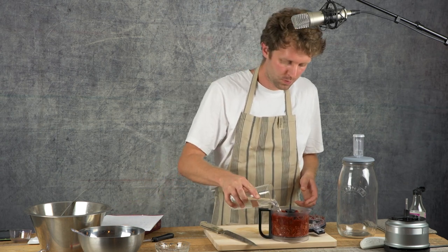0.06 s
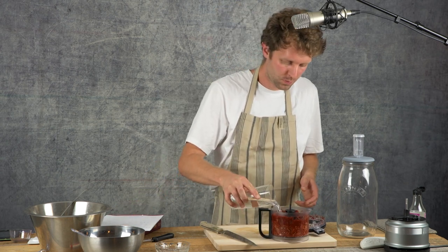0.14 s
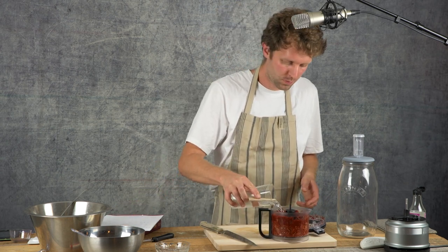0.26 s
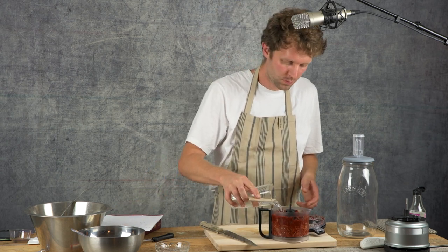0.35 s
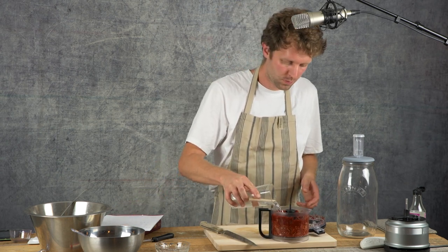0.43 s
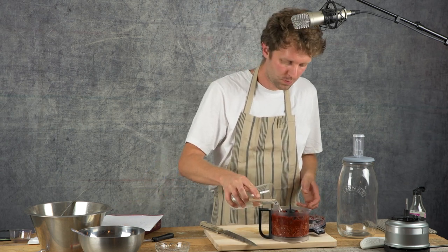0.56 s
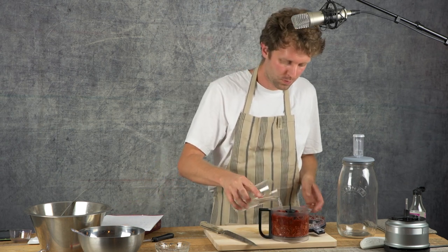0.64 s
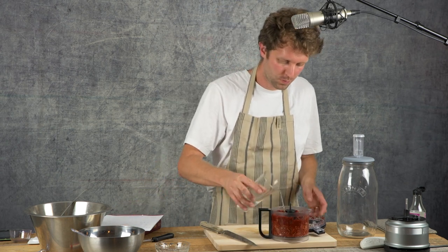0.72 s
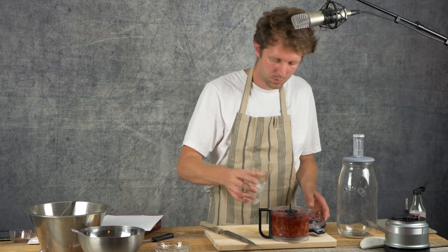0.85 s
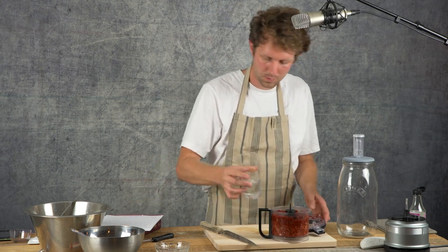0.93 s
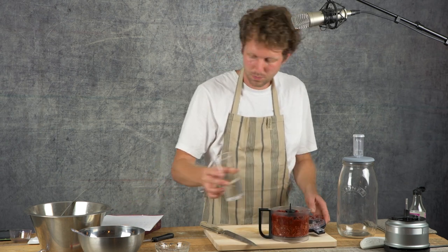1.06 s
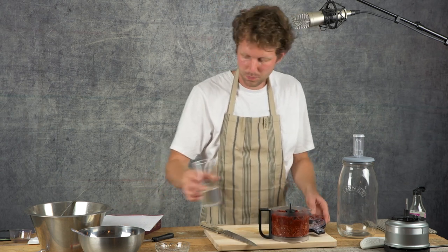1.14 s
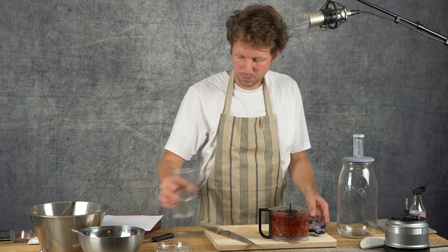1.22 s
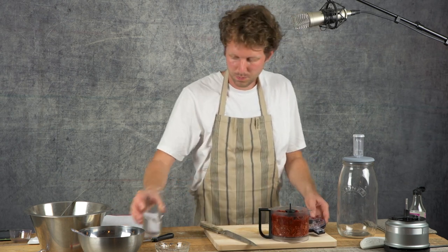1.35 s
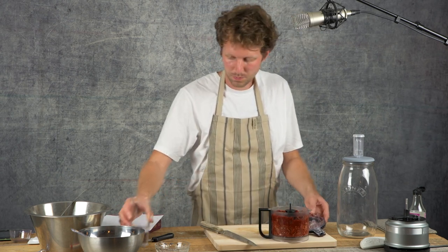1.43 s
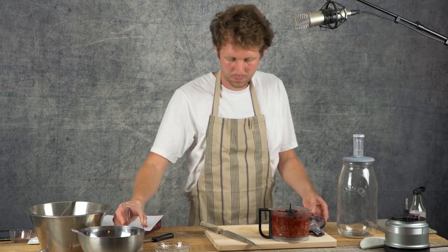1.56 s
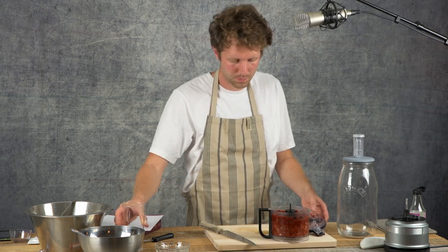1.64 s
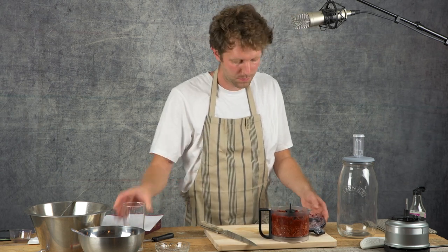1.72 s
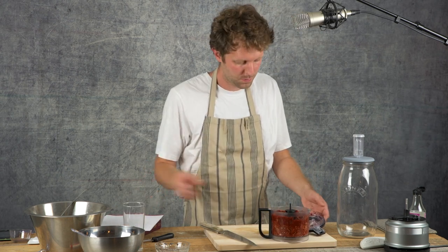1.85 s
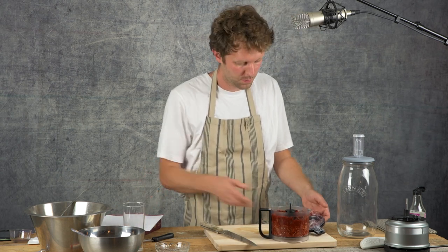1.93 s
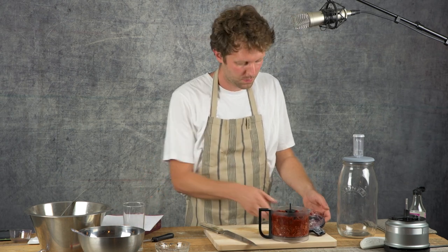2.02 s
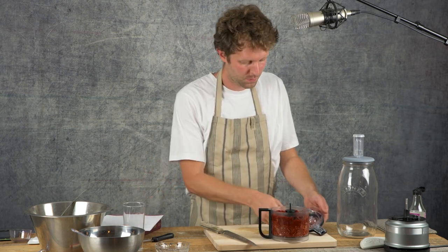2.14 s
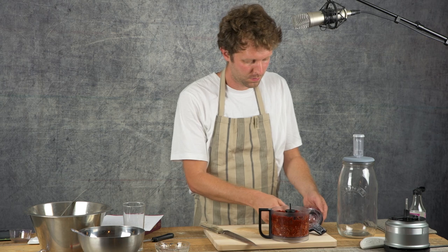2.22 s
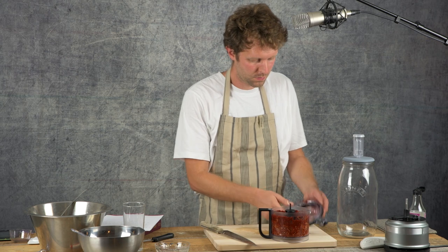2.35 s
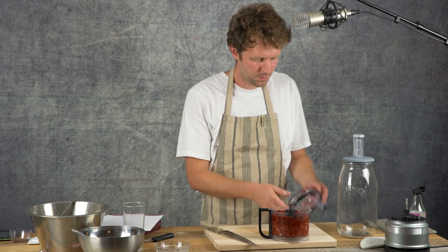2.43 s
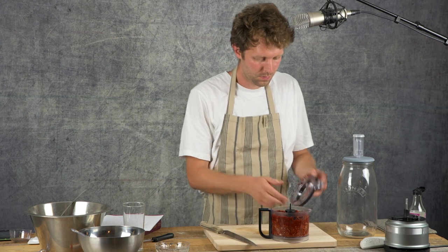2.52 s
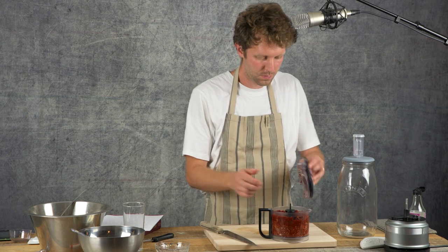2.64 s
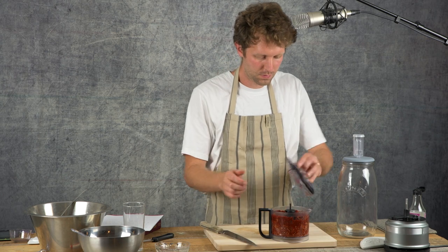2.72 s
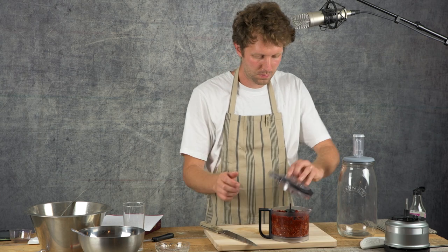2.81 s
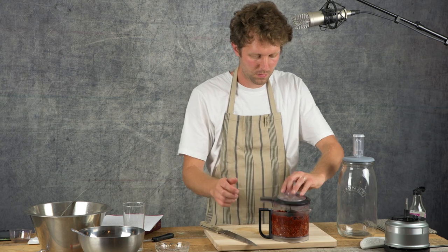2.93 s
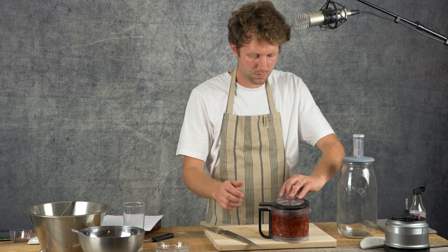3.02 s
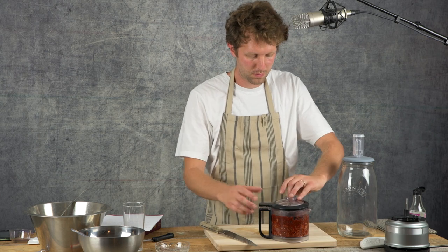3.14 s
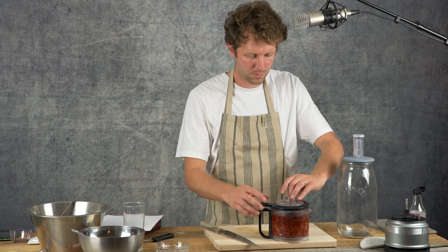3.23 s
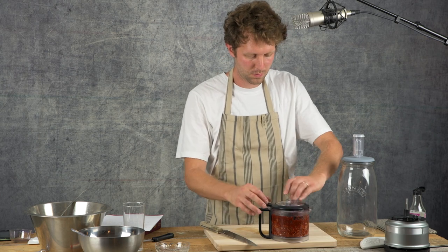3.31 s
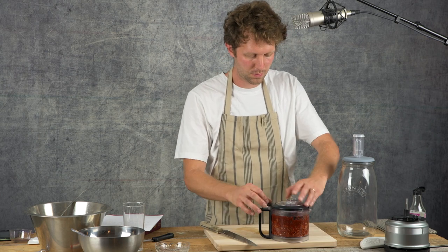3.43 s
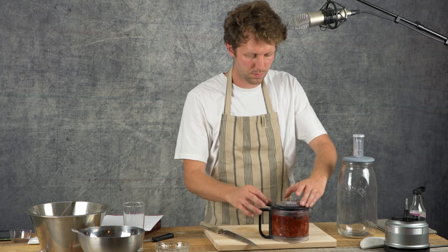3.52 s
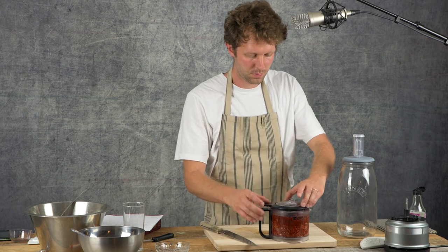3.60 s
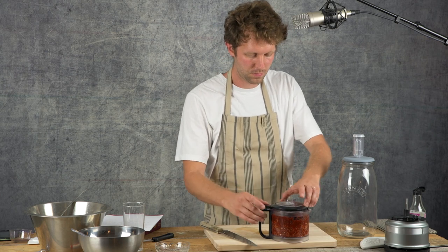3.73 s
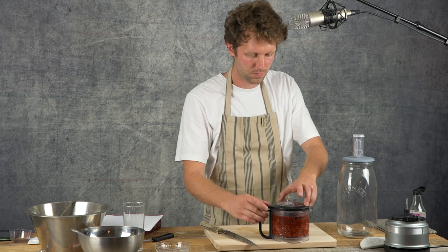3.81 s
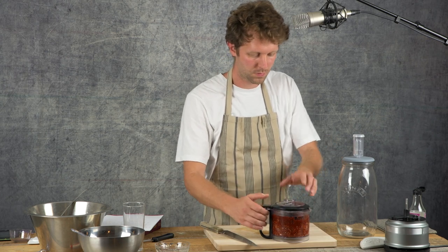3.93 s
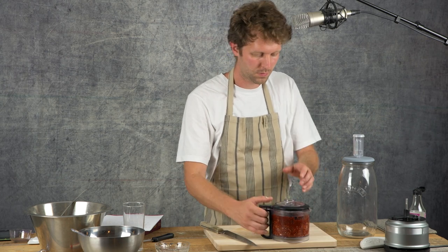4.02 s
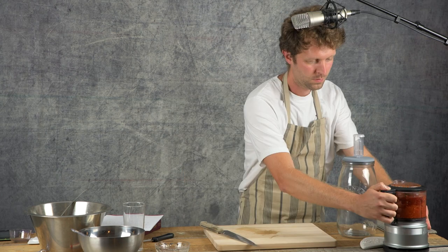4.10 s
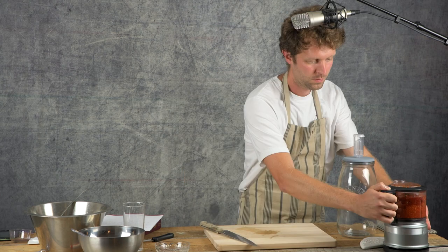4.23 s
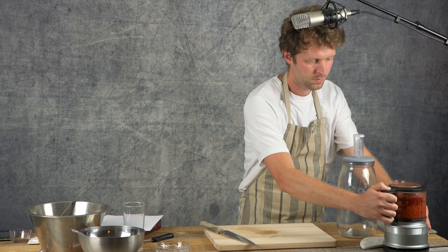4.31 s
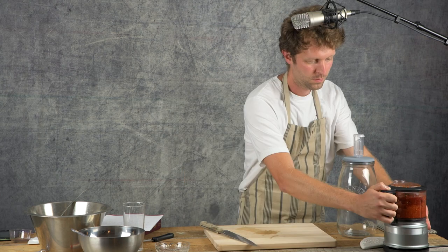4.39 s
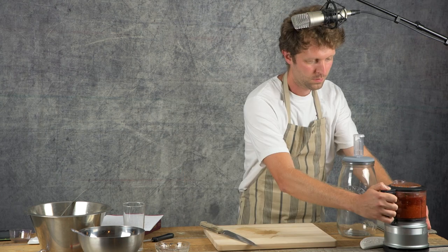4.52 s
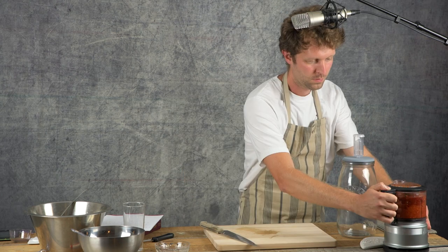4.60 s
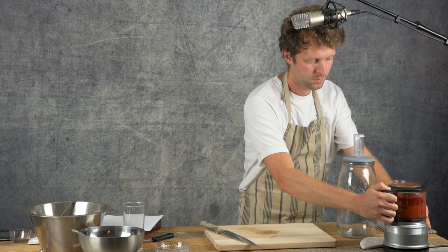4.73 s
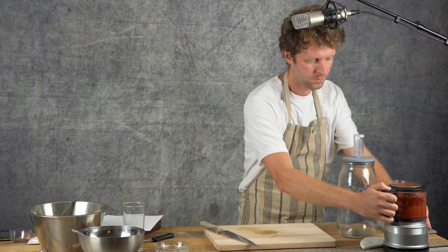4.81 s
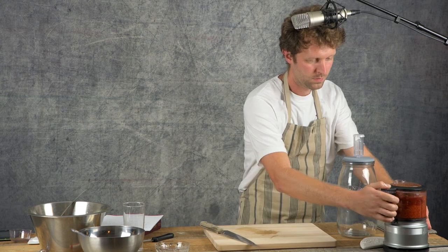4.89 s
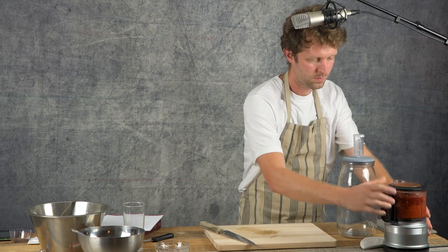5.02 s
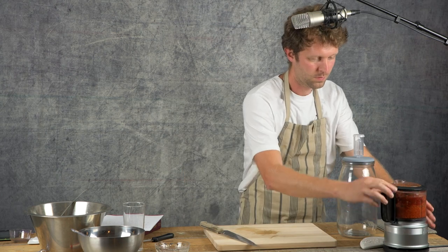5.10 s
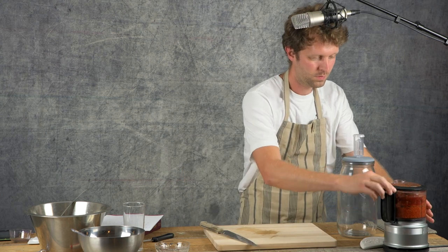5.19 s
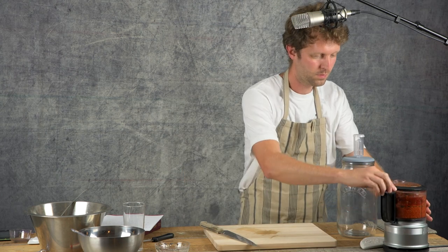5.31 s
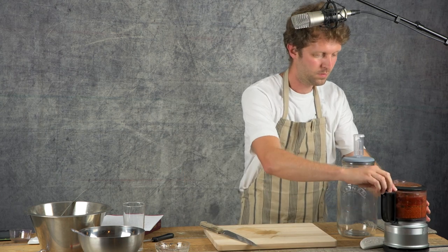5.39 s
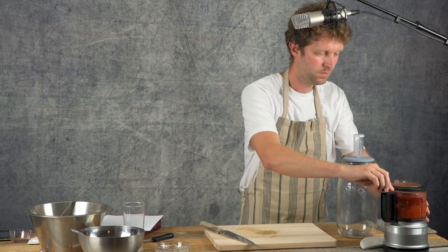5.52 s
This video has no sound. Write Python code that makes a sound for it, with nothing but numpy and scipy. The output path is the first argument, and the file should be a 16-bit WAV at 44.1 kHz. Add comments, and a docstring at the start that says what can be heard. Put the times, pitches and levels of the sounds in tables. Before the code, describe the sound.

Wet bits plop softly, a glass thuds onto wood, a plastic lid clacks and locks, then a small food processor whirs and winds down.

```python
"""Wet bits splat into a mini food processor, then the glass they came from taps and lands on a wooden table.
The plastic lid knocks about, then snaps, rubs and locks onto the bowl: each blow rings tuned modes and noise.
The motor sound begins abruptly, whirs through its gearbox and coasts down: tones and tooth impacts follow
one speed curve. A small kitchen adds a diffuse tail, faint hiss and mains hum."""
import sys
import numpy as np
from scipy import signal
from scipy.fft import rfft, irfft
from scipy.io import wavfile

SR = 44100
rng = np.random.default_rng(int(sys.argv[2]) if len(sys.argv) > 2 else 0)


def persist_wave(psi):
    """Save psi, clipped to +-1, as 16-bit WAV."""
    counts = np.round(np.clip(psi, -1, 1) * 32767).astype(np.int16)
    wavfile.write(sys.argv[1], SR, np.atleast_2d(counts).T)


N = 244887
T = np.arange(N) / SR

# The lid meets the bowl, seats, twists and locks. Each row: time in s, level in dB, bass edge in Hz,
# contact edge in Hz, rebound gap in s, change per rebound in dB, lid ring relative to the level in dB.
BOWL_KNOCKS = [(3.163, -29.5, 650, 500, .008, -14, -16), (3.1825, -33, 496, 593, 0.0074, -16, -10),
               (3.2027, -33.5, 500, 500, .012, -7.5, -12), (3.2356, -35.5, 400, 400, 0.0085, -7, -20),
               (3.254, -37.5, 300, 600, 0.0088, -9, -30), (3.2757, -25.5, 260, 7000, 0.015, -11.5, -20),
               (3.4668, -33.5, 247, 5370, .005, -6.5, -3), (3.4806, -33, 149, 1480, .014, -5.5, -3.5),
               (3.592, -47.5, 200.5, 1200, .014, -5.5, -8), (3.669, -50.5, 400, 12100, 0.0054, -9, -20),
               (3.722, -48.5, 200, 500, .01, -10, -11), (3.759, -51.5, 199.3, 900, .019, -2.5, -16),
               (3.8127, -44, 402, 6000, 0.0051, -6, -21), (3.83, -31, 150, 1710, .007, -9.5, -24),
               (3.8875, -42, 1500, 7000, .003, -7, -15), (3.8935, -29, 110, 7000, 0.0059, -6.5, -1.5)]
# Dense short-lived modes of the bowl. Each row: frequency in Hz, relative level in dB.
BOWL_BODY = [(40, -34), (90, -4.5), (160, -4), (300, 7.5), (420, 9), (540, 1), (690, -2.5), (860, -1),
             (1300, -4), (1520, -12.5), (1900, -4), (2450, -9.5), (3000, -3), (3600, -9.5), (4200, -9),
             (5400, -12.5), (6100, -19.5), (9000, -28.5), (14000, -39)]
TWIST_START_S, TWIST_END_S = 3.3, 3.4  # the lid is pressed and turned
MOTOR_START_S, MOTOR_OFF_S = 4.171, 5.026  # the motor sound begins; the coast-down begins
MESH_HZ = 2585  # tooth rate at full speed


def undb(db):
    """Decibels to gain."""
    return 10 ** (np.asarray(db) / 20)


def unit(x):
    """Scale to rms 1."""
    return x / np.sqrt(np.mean(x ** 2))


def first_order(x, hz, kind="low"):
    """Gentle low-pass or high-pass, 6 dB per octave."""
    return signal.sosfilt(signal.butter(1, hz, kind, fs=SR, output="sos"), x)


def on_log_axis(hz, points):
    """Interpolate (Hz, value) points along log frequency."""
    point_hz, value = np.transpose(points)
    return np.interp(np.log(np.maximum(hz, 1)), np.log(point_hz), value)


def colour(x, points, size=2048):
    """Causal minimum-phase filter with the given (Hz, dB) shape, via the folded cepstrum."""
    gain = undb(on_log_axis(np.fft.rfftfreq(size, 1 / SR), points))
    cepstrum = irfft(np.log(gain))
    cepstrum[1:size // 2] *= 2
    cepstrum[size // 2 + 1:] = 0
    impulse_response = irfft(np.exp(rfft(cepstrum)))
    return signal.fftconvolve(x, impulse_response)[:len(x)]


def resonate(x, hz, width_hz):
    """One resonance, gain 1 at its centre."""
    return signal.lfilter(*signal.iirpeak(hz, hz / width_hz, fs=SR), x)


def fade(t, t60_s):
    """Exponential decay, 60 dB in t60_s."""
    return np.exp(-np.log(1000) * t / t60_s)


def walk(rate_hz, count=24):
    """Smooth random wander of spread 1, up to about rate_hz swings a second."""
    steps = np.arange(-count, T[-1] * rate_hz * count + 2)
    keep = np.exp(-2 * np.pi / count)
    wander = signal.lfilter([1], np.poly([keep, keep]), rng.standard_normal(len(steps)))
    return np.interp(T * rate_hz * count, steps, unit(wander))


def add(track, s, sound):
    """Mix a sound into the track at time s."""
    start = int(s * SR)
    track[start:start + len(sound)] += sound[:N - start]


def knocks(events, modes, body, ring_db, crack_db, grip_s, size=16384):
    """A sharp push rings clear modes and a clatter of dense ones; soft contact dulls, a glancing one thins bass."""
    out, t = np.zeros(N), T[:size]
    attack = SR // 100  # levels are set over the first 10 ms
    grip = 1 - np.exp(-t / grip_s)  # the surfaces take a moment to press together
    for s, db, bass_hz, edge_hz, t60_s in events:
        ring = np.zeros(size)
        chance = rng.standard_normal((len(modes), 2))
        for k, ((hz, mode_db, life_s), (a, b)) in enumerate(zip(modes, chance)):
            tone = np.sin(2 * np.pi * hz * (1 + 0.012 * b) * t) * fade(t, life_s)
            ring += (-1) ** k * undb(mode_db + 2 * a) * tone
        ring *= grip
        push = rng.standard_normal(size) * fade(t, t60_s) * grip
        push[0] = undb(crack_db) * np.linalg.norm(push)
        clatter = colour(push, body)
        blow = clatter / clatter[:attack].std() + undb(ring_db) * ring / ring[:attack].std()
        blow = first_order(blow, min(edge_hz, SR / 2 - 1000))
        blow = first_order(blow, bass_hz, "high")
        add(out, s, undb(db) * blow / blow[:attack].std())
    return out


def bouncing(events, t60_s, touch_s, touch_db, count=5):
    """Each knock is a light first touch, the blow, and rebounds that grow weaker and softer."""
    softening = 0.61  # share of the contact edge kept per rebound
    blows = []
    for s, db, bass_hz, edge_hz, gap_s, rebound_db, *_ in events:
        blows.append((s - touch_s, db + touch_db, bass_hz, edge_hz, t60_s))
        for k in range(count):
            blows.append((s + k * gap_s, db + k * rebound_db, bass_hz, edge_hz * softening ** k, t60_s))
    return blows


def kitchen(x, wet_db, gap_s, count=9):
    """Direct sound plus a diffuse tail whose treble dies first."""
    # Reverberation. Each row: frequency in Hz, t60 in s.
    room = [(60, 0.98), (150, 0.64), (400, 0.57), (1500, 0.48), (4000, 0.39), (12000, 0.3)]
    t = T[:SR]
    noise, hz = rfft(rng.standard_normal(SR)), np.fft.rfftfreq(SR, 1 / SR)
    octave = np.clip(np.log2(np.maximum(hz, 1) / 60), 0, count - 1)
    tail = np.zeros(SR)
    for k in range(count):
        band = irfft(noise * np.maximum(1 - abs(octave - k), 0), SR)
        tail += band * fade(t, on_log_axis(60 * 2 ** k, room))
    tail *= np.clip(t / gap_s - .5, 0, 1)
    return x + undb(wet_db) * signal.fftconvolve(x, tail / np.sqrt(np.sum(tail ** 2)))[:N]


def room_tone(hiss_db, hum_db):
    """Faint steady air noise and slowly wavering mains hum."""
    # Air noise shape. Each row: frequency in Hz, relative level in dB.
    air = [(30, -18), (60, -5.5), (120, -4), (180, -5.5), (340, 1.5), (500, -6), (900, -8), (2500, -13),
           (6700, -21), (11500, -28), (13000, -42), (15000, -53)]
    # Mains harmonics. Each row: frequency in Hz, rms level in dB before hum_db.
    mains = [(50, -79.5), (100, -78), (150, -73.5), (200, -83), (250, -79), (350, -84), (450, -84),
             (650, -86.5)]
    hum = np.zeros(N)
    for hz, db in mains:
        tone = np.sqrt(2) * np.sin(2 * np.pi * (hz * T + rng.random()))
        hum += undb(db + 0.64 * walk(3.4)) * tone
    hiss = unit(colour(rng.standard_normal(N), air))
    return undb(hiss_db) * hiss + undb(hum_db) * hum


def wet_bits(gain_db, patter_db, scatter_db, t60_s, slide_db, size=4096, count=110):
    """Splats, each with a brief rising bubble; finer ones patter while the rest slides off the glass."""
    # The largest bits. Each row: time in s, peak level in dB before gain_db, pitch in Hz.
    large = [(0.058, -49.5, 3830), (0.088, -48.5, 4300), (0.104, -46, 2050), (0.184, -56, 4880),
             (0.374, -55, 7600), (0.328, -40, 3240), (0.395, -42, 2480), (0.434, -37.5, 3550),
             (0.446, -37.5, 2250), (0.542, -37.5, 3400), (0.603, -42, 950)]
    # Wet food sliding on glass. Each row: frequency in Hz, relative level in dB.
    slide = [(900, -9), (2200, 6), (4500, -3), (7000, -25), (13000, -32)]
    pour_s, half_length_s, patter_hz = .48, .19, 3460  # middle of the swell, its half length, typical pitch
    out, t = np.zeros(N), T[:size]
    fine = []
    for a, b, c, d, e in rng.random((count, 5)):
        fine.append((pour_s + half_length_s * (a - b), patter_db + scatter_db * c, patter_hz * 2 ** (d - e)))
    for s, db, hz in list(large) + fine:
        burst = rng.standard_normal(size) * fade(t, t60_s)
        splat = resonate(resonate(burst, hz, hz * 0.51), hz, hz * 0.51)
        bubble = np.sin(2 * np.pi * hz * t * (1 + 3 * t)) * fade(t, 40 / hz)
        drop = (splat / abs(splat).max() + 0.77 * bubble) * (1 - np.exp(-t / 0.00081))
        add(out, s, undb(db + gain_db) * drop / abs(drop).max())
    swell = np.sqrt(np.maximum(1 - abs(T - pour_s) / half_length_s, 0)) * undb(2.7 * walk(35.3))
    return out + undb(slide_db) * swell * unit(colour(rng.standard_normal(N), slide))


def glass_taps():
    """Light taps ring the glass."""
    # Each row: time in s, level in dB, bass edge in Hz, contact edge in Hz, clatter t60 in s.
    taps = [(1.033, -48, 2000, 12000, 0.021), (1.037, -45.5, 400, 5000, 0.022),
            (1.112, -55, 200, 400, 0.022)]
    # Clear modes. Each row: frequency in Hz, relative level in dB, t60 in s.
    modes = [(834, 14, 0.076), (1117, 15.5, 0.075), (2304, 9.5, 0.078), (4230, -9, 0.1), (5227, -15, 0.092),
             (7700, -17, .1)]
    # Dense short-lived modes. Each row: frequency in Hz, relative level in dB.
    body = [(300, -54), (900, 24), (2300, 6), (3300, 4), (5200, 12), (8000, -8), (10000, -6), (15000, -28)]
    return knocks(taps, modes, body, ring_db=0, crack_db=-11, grip_s=0.00044)


def lid_pickup():
    """The loose lid bounces about as it is picked up, ringing its own light plastic modes."""
    # Each row: time in s, level in dB, bass edge in Hz, contact edge in Hz, rebound gap in s,
    # change per rebound in dB.
    lid_knocks = [(1.5805, -34.5, 1500, 4480, 0.018, -6.5), (1.608, -39.5, 250, 3500, .01, -4),
                  (1.7564, -48, 900, 1800, 0.015, -15), (2.137, -63, 900, 1500, 0.0051, -18),
                  (2.198, -43, 900, 1810, 0.011, -24), (2.2093, -34.5, 200, 2800, .006, -16),
                  (2.2951, -49, 1200, 800, .006, -16), (2.4268, -45.5, 9100, 18000, 0.0046, -21)]
    # Clear modes. Each row: frequency in Hz, relative level in dB, t60 in s.
    modes = [(252, -13.5, 0.089), (493, -15, 0.079), (1240, -4.5, 0.025), (1680, 1.5, 0.032),
             (1750, 7, 0.024), (1917, 7, 0.034), (2070, -6, 0.017), (2580, -3, 0.018), (2720, -2.5, 0.016),
             (3327, -3.5, 0.023), (6560, -31, 0.074)]
    # Dense short-lived modes. Each row: frequency in Hz, relative level in dB.
    body = [(100, -21), (400, -3.5), (900, -9), (1400, -3), (1900, 6), (2300, -6), (2750, -4), (3300, -4),
            (4200, -16), (6000, -21), (6800, -18.5), (7800, -21), (8500, -33), (14000, -43)]
    blows = bouncing(lid_knocks, t60_s=0.034, touch_s=0.0063, touch_db=-29)
    return knocks(blows, modes, body, ring_db=-0.5, crack_db=-8.5, grip_s=0.0015)


def table_thuds():
    """The glass lands and rocks, ringing the low modes of the table."""
    # Each row: time in s, level in dB, bass edge in Hz, contact edge in Hz, clatter t60 in s.
    thuds = [(1.669, -26.5, 45, 1000, 0.018), (1.676, -26.5, 45, 800, 0.039), (1.6835, -27, 45, 600, 0.092)]
    # Clear modes. Each row: frequency in Hz, relative level in dB, t60 in s.
    modes = [(59.6, -22, 0.45), (85.2, -10.5, 0.6), (118, -11.5, 0.35), (190, -10, 0.064), (263, 1, 0.049),
             (302, 3.5, 0.072), (380, -2, 0.057), (424, 7, 0.083), (480, -6, 0.031), (557, 0.5, 0.077),
             (635, -8, 0.053), (759, 0.5, 0.098)]
    # Dense short-lived modes. Each row: frequency in Hz, relative level in dB.
    body = [(35, -47), (70, -19), (130, -8), (190, -6.5), (280, -3.5), (430, -3), (600, -6), (780, -6),
            (980, -19.5), (1250, -21.5), (3500, -32.5), (8000, -50)]
    return knocks(thuds, modes, body, ring_db=-1.5, crack_db=2, grip_s=0.00091)


def rim_catches(db, spread_db, bass_hz, edge_hz, t60_s, count=8):
    """Small uneven ticks as the turning rim catches on the bowl."""
    step_s = (TWIST_END_S - TWIST_START_S) / count
    return [(TWIST_START_S + step_s * (k + when), db - spread_db * weak, bass_hz, edge_hz, t60_s)
            for k, (when, weak) in enumerate(rng.random((count, 2)))]


def bowl_closing():
    """Lid knocks and rim catches ring the bowl."""
    # Clear modes. Each row: frequency in Hz, relative level in dB, t60 in s.
    modes = [(76.4, -26, 0.6), (120.7, -23, 0.56), (223, -6.5, 0.1), (290.6, -1.5, 0.076),
             (358, -0.5, 0.057), (414, -1, 0.071), (560, -8.5, 0.058), (821, 0, 0.051), (978, -6, 0.022),
             (1290, -4.5, 0.056), (2034, -4, 0.019), (2980, -4.5, 0.036), (4020, -4.5, 0.03),
             (5350, -6.5, 0.022)]
    blows = bouncing(BOWL_KNOCKS, t60_s=0.029, touch_s=.011, touch_db=-21.5)
    blows += rim_catches(db=-47.5, spread_db=1.5, bass_hz=200, edge_hz=1200, t60_s=0.037)
    return knocks(blows, modes, BOWL_BODY, ring_db=-4, crack_db=-8, grip_s=0.00088)


def lid_ring(hz, t60_s, detune, size=8192):
    """The lid's main mode sings when its edge snaps on the bowl; the grip of the fingers shifts it each time."""
    out, t = np.zeros(N), T[:size]
    for s, db, *_, ring_db in BOWL_KNOCKS:
        pitch_hz = hz * (1 + detune * rng.uniform(-1.15, 1))
        add(out, s, undb(db + ring_db) * 2 * np.sin(2 * np.pi * pitch_hz * t) * fade(t, t60_s))
    return out


def rim_rub(slide_db, slide_t60_s, twist_db, slips_per_s):
    """Irregular slips of plastic on plastic shake the bowl after each knock and while the rim is turned."""
    slips = rng.standard_normal(N) * (rng.random(N) < slips_per_s / SR)
    rub = colour(colour(slips, BOWL_BODY), [(900, 2.5), (2500, -11), (8000, -0.5)])
    envelope = undb(twist_db) * (T > TWIST_START_S) * (T < TWIST_END_S)
    for s, db, *_ in BOWL_KNOCKS:
        envelope += undb(db + slide_db) * (T > s) * fade(np.maximum(T - s, 0), slide_t60_s)
    return envelope * unit(rub)


def motor():
    """Speed as a share of full speed (settle, hold, coast down) and the gear and food gains that follow it."""
    # the motor sound begins abruptly, slightly low and loud, and settles within a few hundredths of a second
    onset_lag, onset_db, settle_s = .04, 3, 0.02996
    coast_s, friction = .35, .15  # drag time constant; dry friction as a share of full-speed drag
    gear_db, food_db = -30.5, -41  # gains at full speed, before the motion terms below
    chatter_speed = 0.24  # share of full speed below which the teeth stop bouncing
    on_s, off_s = np.maximum(T - MOTOR_START_S, 0), np.maximum(T - MOTOR_OFF_S, 0)
    onset = np.exp(-on_s / settle_s)
    coast = np.clip((1 + friction) * np.exp(-off_s / coast_s) - friction, .01, 1)
    speed = (1 - onset_lag * onset) * coast
    chatter = 1 / (1 + (chatter_speed / speed) ** 4.2)
    gear_gain = undb(gear_db + onset_db * onset) * speed ** 0.98 * chatter
    food_gain = undb(food_db) * speed ** 1.25
    return speed, gear_gain, food_gain


def gear_mesh(travel, speed, slop, rough_db, coast_bright_db):
    """Teeth meet at the mesh rate; backlash shakes timing, less as they slow, and force: harmonics smear."""
    slack = 0.31  # loss of speed at which the gears run fully unloaded
    coast_whine_db = 3  # unloaded gears sing out more
    loose = np.minimum((1 - speed) / slack, 1)
    phase = 2 * np.pi * MESH_HZ * travel + slop * np.sqrt(speed) * walk(112)
    harmonics = np.zeros(N)
    for k, db in enumerate([0, -7.5, -18]):
        level = undb(db + k * coast_bright_db * loose) * undb(rough_db * walk(227.6))
        harmonics += level * np.cos((k + 1) * phase)
    return undb(coast_whine_db * loose) * unit(harmonics)


def shaft_whine(travel):
    """Shaft tones and gear sidebands slide with the speed and waver in level and phase."""
    # Each row: frequency at full speed in Hz, relative level in dB.
    tones = [(120, -20.5), (224, -25), (264, -26.5), (291, -24.5), (545, -24), (673, -22.5), (1305, -24),
             (2175, -6.5), (2295, -10), (2356, -8.5), (2433, -15), (2541, -8.5), (2614, -6.5), (2673, -6),
             (2772, -13), (5220, -14.5)]
    whine = np.zeros(N)
    for hz, db in tones:
        phase = 2 * np.pi * hz * travel + hz / MESH_HZ * 1.72 * walk(19.3)
        whine += undb(db + 3.85 * walk(30.3)) * np.cos(phase)
    # a small case radiates no deep bass
    return signal.sosfilt(signal.butter(4, 105, "high", fs=SR, output="sos"), whine)


def tooth_rattle(speed, blade, housing_db, rattle_db):
    """Tooth impacts, sparser as the gears slow, excite the fixed resonances of the housing."""
    # Housing resonances. Each row: frequency in Hz, width in Hz, relative level in dB.
    resonances = [(1300, 44, 7), (1620, 320, 0), (2060, 290, 5), (2310, 120, 2), (2720, 160, -1),
                  (4720, 480, -1), (5200, 390, -2.5), (7500, 770, -1.5)]
    # Loose rattle shape. Each row: frequency in Hz, relative level in dB.
    rattle_shape = [(50, -32), (300, -14), (900, -6), (1500, 2.5), (2700, -3.5), (3600, -8), (4300, -8),
                    (5700, -7.5), (6700, -13), (7900, -20.5), (9000, -22.5), (10800, -25), (13000, -40),
                    (16000, -59)]
    impacts = (rng.random(N) < speed * MESH_HZ / SR) * rng.standard_normal(N)
    impacts = impacts / np.sqrt(np.maximum(speed, .05))
    impacts = impacts * (1 + 0.036 * blade) * undb(0.5 * walk(44.4))
    housing = unit(sum(undb(db) * resonate(impacts, hz, width_hz) for hz, width_hz, db in resonances))
    housing = colour(housing, [(500, -26.5), (1200, -1.5), (7500, -10.5), (9500, -34), (15000, -47)])
    rattle = undb(housing_db) * housing + undb(rattle_db) * unit(colour(impacts, rattle_shape))
    # slow teeth strike softly, so the rattle dulls
    return speed ** 1.27 * rattle + (1 - speed) * 2.2 * first_order(rattle, 1900)


def processor(mesh_db, whine_db, housing_db, rattle_db, churn_db, brush_db):
    """Gear tones slide with the speed, teeth rattle the housing, the blade churns food and the brushes hiss."""
    # Churned food. Each row: frequency in Hz, relative level in dB.
    churn_shape = [(40, -35), (90, -45), (150, -14), (280, 4), (380, -3), (530, -0.5), (850, -7.5),
                   (1200, -15), (3000, -47)]
    speed, gear_gain, food_gain = motor()
    travel = np.cumsum(speed * (1 + 0.00196 * walk(5.633))) / SR  # seconds' worth of full-speed turning
    blade = np.cos(2 * np.pi * 121 * travel)  # the load swings as the blade sweeps round
    tones = undb(mesh_db) * gear_mesh(travel, speed, slop=1.27, rough_db=3.5, coast_bright_db=3.0)
    tones = tones + undb(whine_db) * shaft_whine(travel)
    gears = tooth_rattle(speed, blade, housing_db, rattle_db)
    gears = gears + tones * np.maximum(speed, 0) ** 0.63 * (1 + 0.22 * blade)
    churn = unit(colour(rng.standard_normal(N) * undb(2.6 * walk(20.8)), churn_shape))
    # steady hiss of the brushes on the commutator
    hiss_shape = [(1000, -4), (2500, -5), (5500, 0), (8000, -10.0), (14000, -24)]
    brushes = undb(brush_db) * unit(colour(rng.standard_normal(N), hiss_shape))
    running = np.clip((T - MOTOR_START_S) / 0.00033, 0, 1)
    return running * (gear_gain * gears + food_gain * undb(churn_db) * churn + brushes)


def base_shudder(db, hz, width_hz, at_speed, speed_spread):
    """The slowing rotor passes through the resonance of the base, which booms briefly."""
    speed = motor()[0]
    boom = resonate(resonate(rng.standard_normal(N), hz, width_hz), hz, width_hz)
    passing = np.exp(-((speed - at_speed) / speed_spread) ** 2) * (T > MOTOR_OFF_S)
    return undb(db) * passing * unit(boom)


def scene():
    """Glass, lid and machine in the kitchen."""
    background = room_tone(hiss_db=-68.5, hum_db=-1.0)
    glass = wet_bits(gain_db=-3.0, patter_db=-64, scatter_db=13, t60_s=0.023, slide_db=-67) + glass_taps()
    lid = lid_pickup()
    table = table_thuds()
    bowl = bowl_closing() + lid_ring(hz=1890, t60_s=0.032, detune=0.038)
    bowl += rim_rub(slide_db=-22.5, slide_t60_s=0.44, twist_db=-59, slips_per_s=1300)
    machine = processor(mesh_db=-7.5, whine_db=-4, housing_db=-6.0, rattle_db=-9.0, churn_db=-5.0, brush_db=-66.5)
    machine += base_shudder(db=-46.5, hz=301, width_hz=80, at_speed=0.63, speed_spread=0.22)
    mix = background + kitchen(glass + lid, wet_db=-8.5, gap_s=0.0023)
    mix += kitchen(table + bowl, wet_db=-9.0, gap_s=0.0064)
    mix += kitchen(machine, wet_db=-4.5, gap_s=0.0085)
    return mix[None]


def record(dry):
    """The microphone sheds the deepest bass; the recorder cuts the top."""
    dry = signal.sosfilt(signal.butter(6, 40, "high", fs=SR, output="sos"), dry)
    return signal.sosfilt(signal.ellip(8, .2, 70, 15300, fs=SR, output="sos"), dry)


dry = scene()
out = record(dry)
persist_wave(out)
```